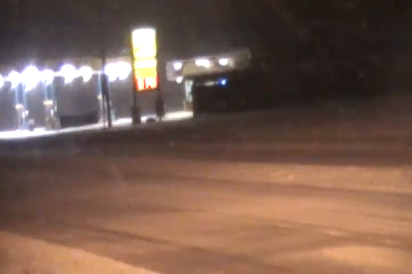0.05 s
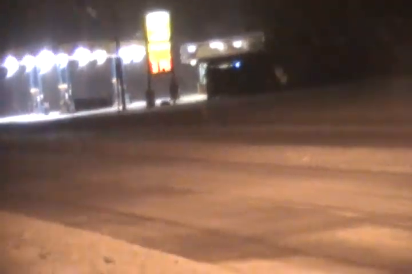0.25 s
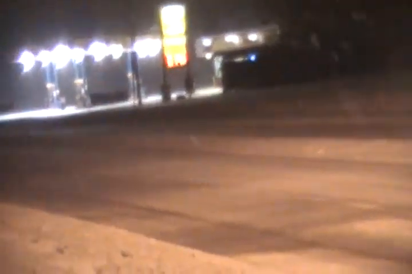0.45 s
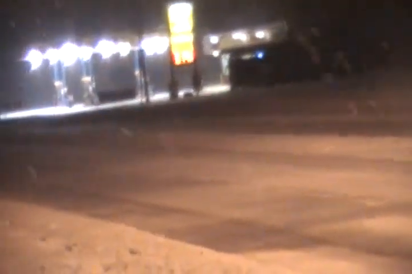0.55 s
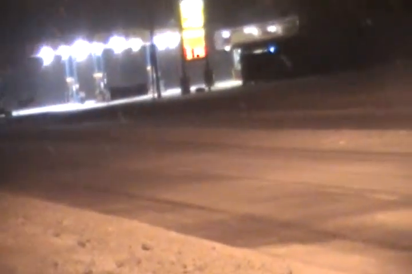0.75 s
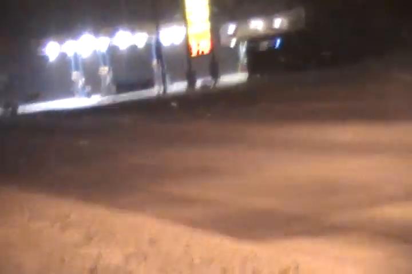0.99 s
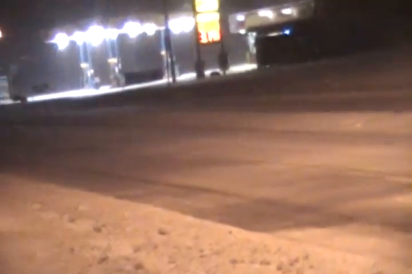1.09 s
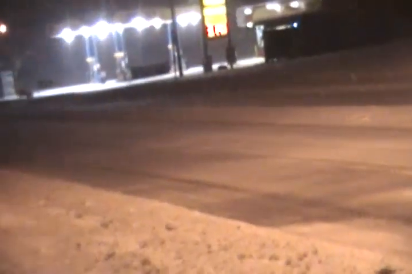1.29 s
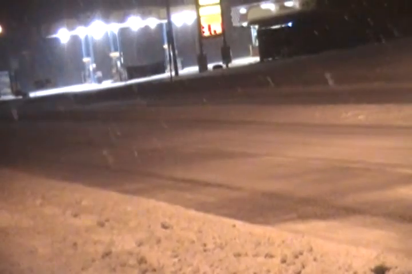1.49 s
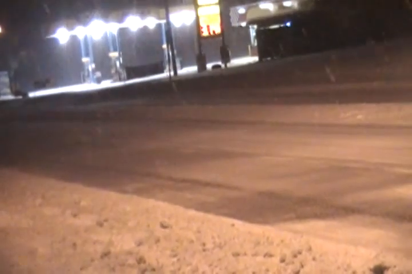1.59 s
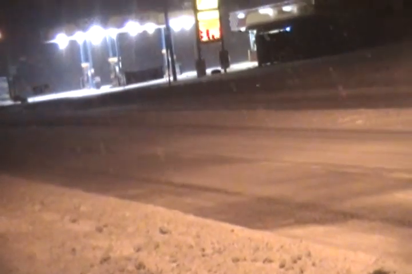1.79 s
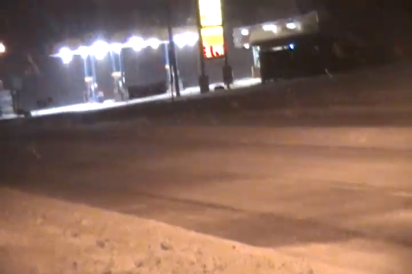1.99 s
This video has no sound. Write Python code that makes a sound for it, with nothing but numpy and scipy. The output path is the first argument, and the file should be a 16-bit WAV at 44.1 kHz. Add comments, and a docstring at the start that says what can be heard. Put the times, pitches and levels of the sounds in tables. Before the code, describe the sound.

A gust of wind buffets the microphone with low rumbling, pops and a few hollow knocks. Behind it, sleet hisses and ticks on a snowy road, while a small lens motor chirps faintly, then the camera clicks and clacks.

```python
"""A gust of wind buffets the microphone, with sharp pops as eddies cross its ports and a few hollow knocks.
Behind it, sleet falls on a snowy road at night: far grains merge into a fine hiss, nearer ones
patter, and pellets crack close by. A small lens motor chirps in quick steps, clicks twice and
whines faintly; the camera body clacks twice."""
import sys
import numpy as np
from scipy import signal
from scipy.io import wavfile
from scipy.ndimage import uniform_filter1d, map_coordinates

SR = 44100
rng = np.random.default_rng(int(sys.argv[2]) if len(sys.argv) > 2 else 0)


def unload_wav(signal):
    """Save mono or channel-first audio to the path in sys.argv[1] as 16-bit WAV at rate SR, clipped to [-1, 1]."""
    wavfile.write(
        sys.argv[1],
        SR,
        np.round(np.clip(np.atleast_2d(signal).T, -1, 1) * 32767).astype(np.int16),
    )


N = 90404
T = np.arange(N) / SR

# how hard the sleet falls: time_s, level_db
SLEET_LEVEL = [(0.0, -39), (0.32, -39.5), (1.27, -42.5), (1.58, -40), (1.87, -44.5), (2.05, -45)]
# tone of the far sleet: frequency_hz, density_db
HISS_SPECTRUM = [(500, 9.5), (1100, 1), (2500, 0), (4500, -2.5), (6200, 1), (7700, 1), (10100, -1),
                 (11500, -29), (13000, -51)]
# close ice strikes: start_s, level_db, pitch_hz, left_over_right_db
PELLET_HITS = [(0.1397, -33, 3900, 3), (.2586, -27.5, 7800, -7), (0.3727, -29, 7150, 7),
               (0.4424, -23, 8100, -3), (0.5901, -29.5, 7200, 6), (0.7925, -21.5, 6900, 1),
               (0.799, -22.5, 10300, -2), (0.8286, -21, 8360, 15), (0.835, -27, 7800, 13),
               (0.868, -26, 7600, 22), (0.9018, -22, 6500, 7), (0.9266, -24.5, 7700, -3),
               (0.9892, -30.5, 5240, 0), (1.0345, -22, 7000, 7), (1.1795, -27, 6100, 1),
               (1.1893, -25.5, 4500, -1), (1.1927, -26, 8000, 4), (1.3855, -27, 7400, -1),
               (1.438, -26.5, 7860, 2), (1.492, -27.5, 8600, 7), (1.548, -25.5, 7000, 7),
               (1.5631, -21.5, 7700, 3), (1.6743, -32, 9900, 0), (1.6781, -19.5, 6100, 2),
               (1.824, -35, 7400, 5), (1.8365, -28.5, 6100, -3), (1.9134, -35.5, 6100, -9),
               (1.9203, -25, 6850, 4)]
# bursts of focus steps: start_s, end_s, level_db
FOCUS_BURSTS = [(0.138, .19, -39), (0.207, .42, -37), (.4735, .62, -37.5), (0.673, .82, -38),
                (0.872, .92, -38.5), (0.9725, 1.12, -37.5)]
# long, smooth motor moves: start_s, end_s, level_db
WHINE_RUNS = [(1.21, 1.315, -51), (1.353, 1.51, -54.5)]
# the lens drive engaging: start_s, level_db, left_over_right_db
CLICK_HITS = [(1.1909, -19, 1.5), (1.2068, -21, -5)]
# ring of the lens barrel: pitch_hz, level_db, t60_s
BARREL_MODES = [(1740, 0.5, 0.0064), (2180, -0.5, 0.0058), (2743, -4.5, 0.014)]
# taps on the camera body: start_s, level_db, favoured_pitch_hz, left_over_right_db
CLACK_HITS = [(1.5636, -14.5, 7100, -8), (1.6771, -14.5, 1570, 1.5)]
# ring of the camera body: pitch_hz, level_db, t60_s
BODY_MODES = [(1480, 0, .006), (1880, -3, .007), (2230, -2, .006), (2900, -7, .006), (5600, -4, .007),
              (7950, 0, .007), (9700, -4, .007)]
# soft blows at the microphone: start_s, level_db, left_over_right_db
KNOCK_HITS = [(0.3862, -23.5, 22), (.823, -17, -17), (1.026, -29.5, 14), (1.1416, -19, -17)]
# eddies crossing a port: centre_s, level_db, left_over_right_db, width_s
EDDIES = [(0.571, -3, -17, 0.0019), (0.6163, 4.5, -10, 0.0021), (0.6278, -3, -15, 0.0012),
          (0.6692, 2.5, -18, 0.0022), (.708, -21, 12, 0.0065), (0.721, 2.5, 11, 0.002),
          (0.7335, 3.5, 0, 0.0022), (0.7973, 2.5, 18, 0.0015), (.819, 1.5, 13, 0.003),
          (0.8254, 3.5, -28, 0.0011), (0.9012, -12.5, 15, 0.0013), (0.9288, 1.5, -12, 0.0017),
          (0.9699, -4.5, -23, 0.0013), (1.03, 6.5, -16, 0.0019), (1.0354, 9.5, 4, 0.0018),
          (1.092, 0.5, -30, 0.0024), (1.1398, 4, 15, 0.0017), (1.1454, 3.5, -22, 0.00072),
          (1.252, 0.5, 27, .0027), (1.2606, 3.5, -23, 0.0017), (1.394, -3, 1, 0.0023),
          (1.619, 1, -25, 0.0032)]
# swell of the gust: time_s, level_db
GUST_LEVEL = [(0, -25), (.02, -32), (.08, -34), (.12, -27), (.145, -31), (.21, -26), (.31, -24), (.36, -33),
              (.385, -27), (.43, -31), (.555, -32), (.57, -25), (.585, -31), (.605, -31), (.62, -19),
              (.695, -19), (.735, -15), (.755, -30), (.79, -32), (.805, -21), (.83, -17), (.895, -17),
              (.945, -22), (.965, -20), (1.01, -25), (1.035, -18), (1.06, -26), (1.11, -23), (1.145, -18),
              (1.165, -24), (1.225, -27), (1.255, -19), (1.28, -37), (1.315, -26), (1.36, -32),
              (1.395, -23), (1.42, -27), (1.475, -26), (1.495, -35), (1.545, -36), (1.625, -26),
              (1.65, -32), (1.78, -30), (1.85, -38), (1.91, -32), (2.05, -40)]
# tone of the wind: frequency_hz, density_db
WIND_SPECTRUM = [(20, -4), (45, 2.5), (75, 0.5), (103, 5), (140, 0.5), (200, -7), (310, -14.5),
                 (450, -37.5), (750, -101), (1500, -78)]


def from_db(db):
    """Decibels to gain."""
    return 10 ** (np.asarray(db) / 20)


def rms_one(x):
    """Scale to unit power."""
    return x / np.sqrt(np.mean(x ** 2) + 1e-20)


def in_time(rows):
    """A control curve at every sample."""
    return np.interp(T, *np.transpose(rows))


def panned(pan_db):
    """Left and right gains of equal total power."""
    gains = from_db(np.array([[.5], [-.5]]) * pan_db)
    return gains / np.sqrt(np.mean(gains ** 2, axis=0))


def filtered(x, hz, kind, order=2):
    """Butterworth filter."""
    sos = signal.butter(order, np.clip(hz, 10, .45 * SR), kind, fs=SR, output="sos")
    return signal.sosfilt(sos, x + 1e-18)


def drift(rate_hz):
    """A slow random wobble of unit power."""
    pole = np.exp(-80 * np.pi * rate_hz / SR)
    slow = signal.lfilter([1], [1, -2 * pole, pole * pole], rng.standard_normal(N // 40 + 2002))[2000:]
    return np.interp(np.arange(N) / 40, np.arange(len(slow)), rms_one(slow))


def resonance(x, hz, width_hz):
    """A two-pole resonance with gain 1 at its peak."""
    r = np.exp(-np.pi * width_hz / SR)
    feedback = [1, -2 * r * np.cos(2 * np.pi * hz / SR), r * r]
    return signal.lfilter(np.array([1, 0, -1]) * (1 - r * r) / 2, feedback, x + 1e-18)


def ring(x, hz, t60):
    """A unit click sets a sine of height 1 ringing."""
    r, w = np.exp(-np.log(1000) / (t60 * SR)), 2 * np.pi * hz / SR
    return signal.lfilter([0, np.sin(w)], [1, -2 * r * np.cos(w), r * r], x + 1e-18)


def add(out, s, sound):
    """Mix a short sound in at a time."""
    i = max(int(s * SR), 0)
    out[:, i:i + sound.shape[-1]] += sound[..., :N - i]


def noise_bands(spectrum, likeness, edges):
    """Stereo noise as a list of (centre_hz, band), together of unit power."""
    white, bands = rng.standard_normal((2, 2, N + SR // 4)), []
    points_hz, points_db = np.transpose(spectrum)
    for k, (low, high) in enumerate(zip(edges, edges[1:])):
        mid, side = filtered(white[k % 2], [low, high], "band")[:, -N:]
        hz = np.sqrt(low * high)
        gain = from_db(np.interp(np.log(hz), np.log(points_hz), points_db))
        stereo = np.sqrt(1 + likeness) * mid + np.sqrt(1 - likeness) * side * [[1], [-1]]
        bands.append((hz, gain * stereo))
    total = np.std(sum(band for hz, band in bands))
    return [(hz, band / total) for hz, band in bands]


def sleet_hiss():
    """Countless far grains merge into a hiss whose bands flicker separately."""
    bands = noise_bands(HISS_SPECTRUM, likeness=.88, edges=np.geomspace(400, 14000, 17))
    return from_db(-3) * sum(band * from_db(2.5 * drift(rate_hz=28)) for hz, band in bands)


def ice_crunch(count):
    """The fine fracture noise of ice, partly alike left and right."""
    mid, side = rng.choice([-1, 1], (2, count))
    return mid + .5 * side * np.array([[1], [-1]])


def sleet_patter():
    """Nearer grains land at random, each a tiny crunch with its own size, pitch and side."""
    grains_per_s, grain_s, spread_db, grain_q = 650, .00044, 7, .24
    sizes = from_db(spread_db * np.minimum(rng.exponential(1, N), 2.6))
    lands = rng.random(N) < grains_per_s / SR
    power = (sizes * lands * panned(13 * rng.standard_normal(N))) ** 2
    pitches_hz = np.geomspace(3430, 9600, 6)
    pitch_index = rng.integers(0, len(pitches_hz), N)
    out, pole = 0, np.exp(-2 / (grain_s * SR))
    for k, hz in enumerate(pitches_hz):
        # each landing swells and dies away
        swell = signal.lfilter([1], [1, -2 * pole, pole * pole], power * (pitch_index == k) + 1e-18)
        out += resonance(np.sqrt(swell) * ice_crunch(N), hz, hz / grain_q)
    return from_db(-1) * rms_one(filtered(out, 710, "high"))


def ice_pellets():
    """A pellet shatters in a short crack and its fragments scatter."""
    attack_s, crack_s, scatter_s = .00018, .00048, .0031
    out, t = np.zeros((2, N)), np.arange(SR // 40) / SR
    decay = np.exp(-t / crack_s) + from_db(-18) * np.exp(-t / scatter_s)
    envelope = (1 - np.exp(-t / attack_s)) * decay
    envelope_rms = np.sqrt(np.mean(envelope ** 2))
    for s, db, hz, pan_db in PELLET_HITS:
        crack = resonance(ice_crunch(len(t)) * envelope, hz, width_hz=6200)
        add(out, s, from_db(db + 8) * panned(pan_db) * rms_one(crack) * envelope_rms)
    return out


def lens_motor():
    """Each focus step is a chirp that spins up and dies; longer moves give a thin, rough whine."""
    steps_per_s, start_hz, top_hz, whine_hz = 30, 1870, 2136, 1740
    glide_s, attack_s, decay_s, fade_s = .00071, .0028, .0062, .0033
    out, t = np.zeros((2, N)), np.arange(SR // 25) / SR
    hz = top_hz + (start_hz - top_hz) * np.exp(-t / glide_s)
    envelope = np.minimum(t / attack_s, np.exp(-(t - attack_s) / decay_s))
    for start, end, db in FOCUS_BURSTS:
        for s in np.arange(start, end, 1 / steps_per_s):
            gain, detune = from_db(db + rng.normal(0, 1)), rng.normal(1, .0078)
            add(out, s, gain * envelope * np.sin(2 * np.pi * np.cumsum(hz * detune) / SR))
    whine = np.sin(2 * np.pi * whine_hz * T) * (1 + .97 * drift(rate_hz=52))
    for start, end, db in WHINE_RUNS:
        out += from_db(db) * whine * np.clip(np.minimum(T - start, end - T) / fade_s, 0, 1)
    return out


def lens_clicks():
    """The drive clicks as it starts a long move, ringing the lens barrel's close-set modes."""
    out, tap = np.zeros((2, N)), signal.unit_impulse(SR // 20)
    barrel = sum((-1) ** k * from_db(db) * ring(tap, hz, t60)
                 for k, (hz, db, t60) in enumerate(BARREL_MODES))
    click = filtered(barrel, [1500, 3100], "band")
    for s, db, pan_db in CLICK_HITS:
        add(out, s, from_db(db) * panned(pan_db) * click)
    return out


def body_clacks():
    """Brief rough contacts ring the camera body; each spot favours the modes near one pitch."""
    contact_s, fall_db_per_octave = .00022, 7.5
    out, t = np.zeros((2, N)), np.arange(SR // 20) / SR
    for s, db, favoured_hz, pan_db in CLACK_HITS:
        grit = rng.standard_normal(len(t)) * np.exp(-t / contact_s)
        contact = (t == 0) + .3 * grit / np.linalg.norm(grit)
        clack = 0
        for hz, mode_db, t60 in BODY_MODES:
            octaves_off = abs(np.log2(hz / favoured_hz))
            clack += from_db(mode_db - fall_db_per_octave * octaves_off) * ring(contact, hz, t60)
        add(out, s, from_db(db - 3) * panned(pan_db) * clack)
    return out


def hollow_knocks():
    """A soft blow swells and dies within a few cycles of one hollow tone."""
    pitch_hz, swell_s = 542, .0016
    out, t = np.zeros((2, N)), np.arange(SR // 30) / SR
    knock = t / swell_s * np.exp(1 - t / swell_s) * np.sin(2 * np.pi * pitch_hz * t)
    for s, db, pan_db in KNOCK_HITS:
        add(out, s, from_db(db) * panned(pan_db) * knock)
    return out


def eddy_pops():
    """Each eddy is a pointed dip of pressure with a broad rebound; the narrow ones tear at the tip."""
    typical_width_s, typical_tip_s = .0011, .00008
    out, t = np.zeros((2, N)), np.arange(-SR // 50, SR // 50) / SR
    for s, db, pan_db, width_s in EDDIES:
        bluntness = (width_s / typical_width_s) ** 2
        dip = np.exp(-np.hypot(t, typical_tip_s * bluntness) / width_s)
        rebound = np.exp(-(t / (2.57 * width_s)) ** 2)
        rebound *= dip.sum() / rebound.sum()  # gives back what the dip takes
        rasp = rms_one(filtered(rng.standard_normal(len(t)), 1270, "low"))
        tear = .18 / (1 + bluntness ** 2) * rasp
        add(out, s + t[0], from_db(db) * panned(pan_db) * (rebound - dip * (1 + tear)))
    return out


def wind_buffet():
    """Lumpy turbulence, different at each port, that rides the gust and brightens as it grows."""
    bright_above_hz, rumble_below_hz, lumps_per_s, leveller_s = 230, 90, 16.3, .035
    gust_db, turbulence = in_time(GUST_LEVEL), 0
    for hz, band in noise_bands(WIND_SPECTRUM, likeness=0, edges=np.geomspace(18, 1800, 18)):
        # the top grows faster than the gust, the deep rumble slower
        tilt = .36 * (hz > bright_above_hz) - .18 * (hz < rumble_below_hz)
        turbulence += band * from_db(tilt * (gust_db - gust_db.mean()))
    power = uniform_filter1d(turbulence ** 2, int(leveller_s * SR), axis=-1)
    flutter = turbulence / np.sqrt(power + 1e-6)  # steady level, fast flutter kept
    lumps_db = 1.5 * np.clip([drift(lumps_per_s), drift(lumps_per_s)], -2, 2)
    lumps = filtered(rms_one(from_db(lumps_db)), 2 * lumps_per_s, "low")
    return flutter * lumps * from_db(gust_db + 4.5) * panned(-1.5)


def scene():
    """A bed of sleet, wind up front and small camera noises; the right channel lags by a hair."""
    right_lag_s = .000013
    sleet = (sleet_hiss() + sleet_patter()) * from_db(in_time(SLEET_LEVEL)) * panned(.4)
    wind = wind_buffet() + eddy_pops() + hollow_knocks()
    left, right = sleet + wind + ice_pellets() + body_clacks() + lens_clicks() + lens_motor()
    late_right = map_coordinates(right, [np.arange(N) - right_lag_s * SR], order=3, mode="nearest")
    return np.array([left, late_right])


def record(dry):
    """Soft clipping rounds off the strongest buffets, and a steep low-pass cuts the top."""
    cutoff_hz = 11500
    rounded = dry / (1 + dry ** 4) ** .25
    return signal.sosfilt(signal.butter(14, cutoff_hz, fs=SR, output="sos"), rounded)


dry = scene()
out = record(dry)
unload_wav(out)
```